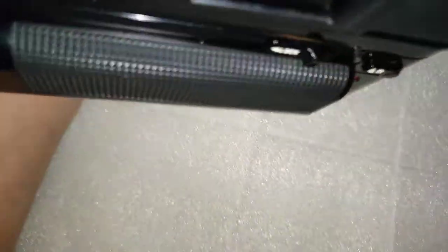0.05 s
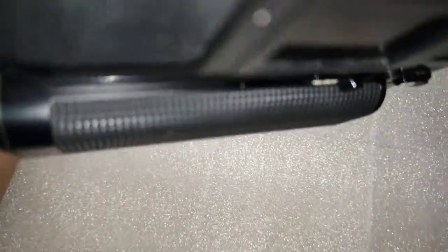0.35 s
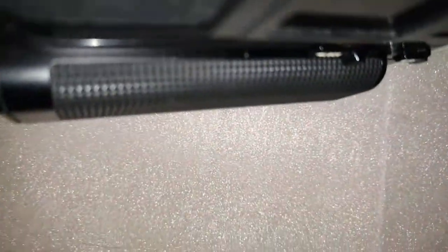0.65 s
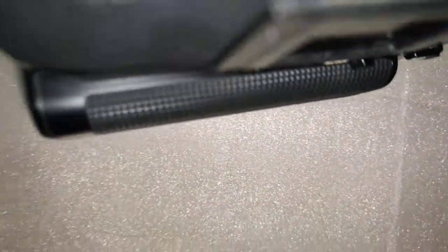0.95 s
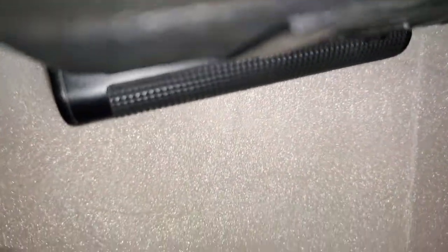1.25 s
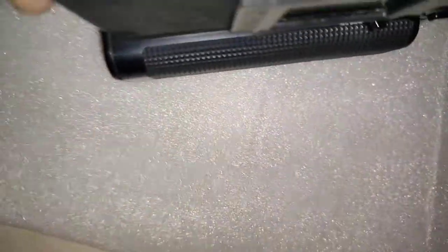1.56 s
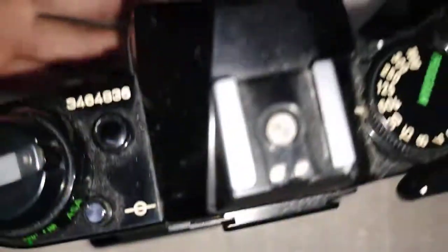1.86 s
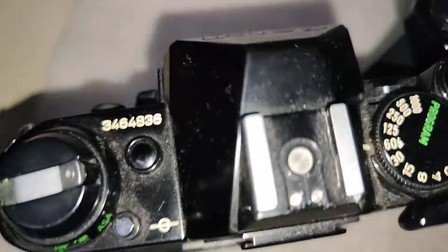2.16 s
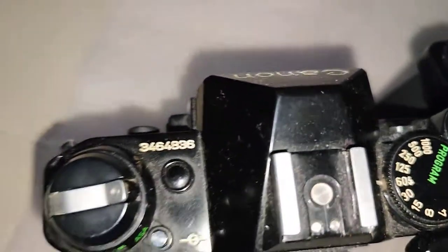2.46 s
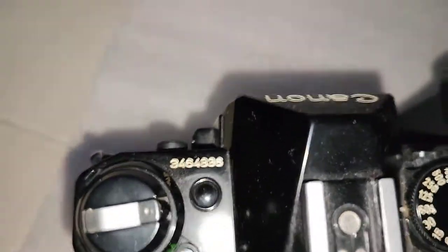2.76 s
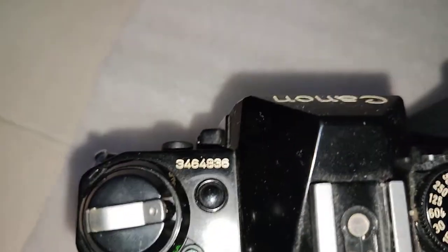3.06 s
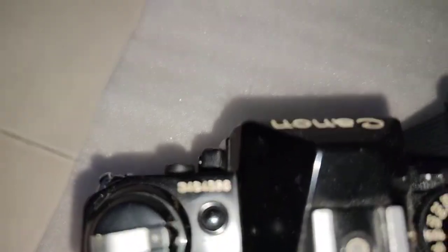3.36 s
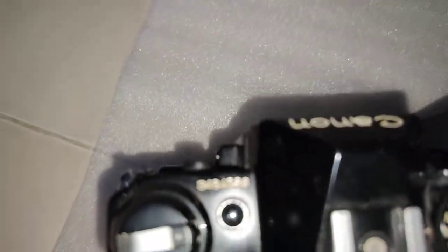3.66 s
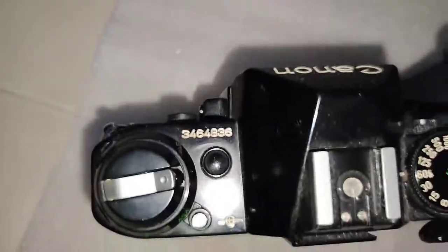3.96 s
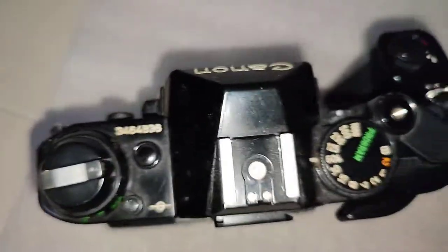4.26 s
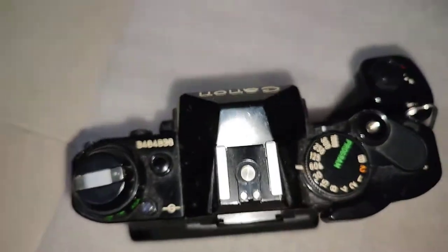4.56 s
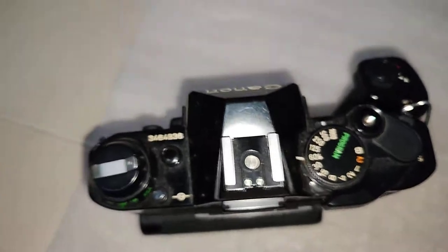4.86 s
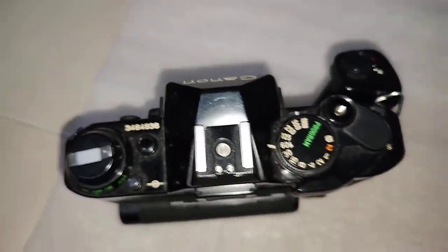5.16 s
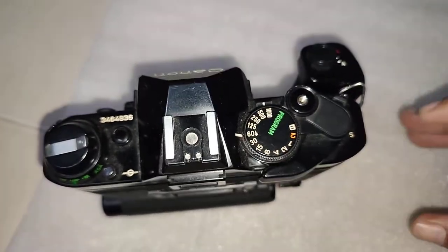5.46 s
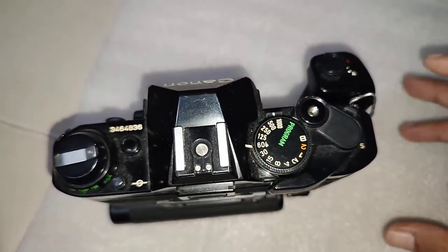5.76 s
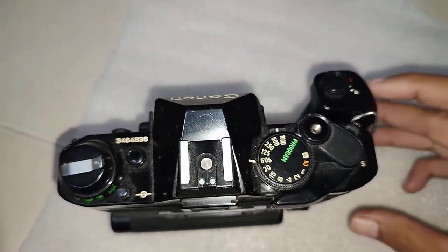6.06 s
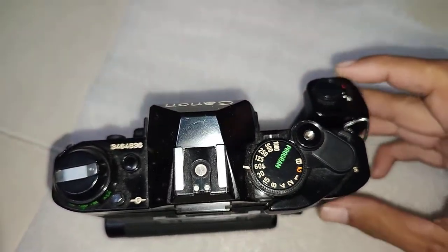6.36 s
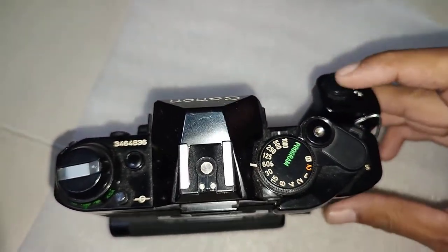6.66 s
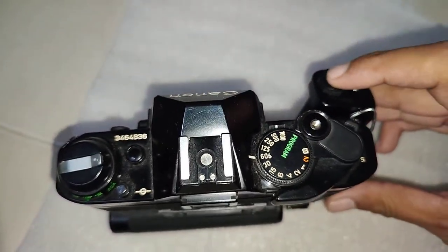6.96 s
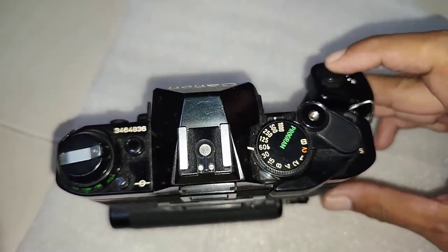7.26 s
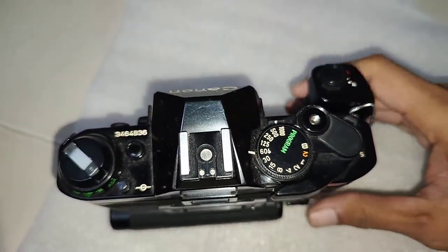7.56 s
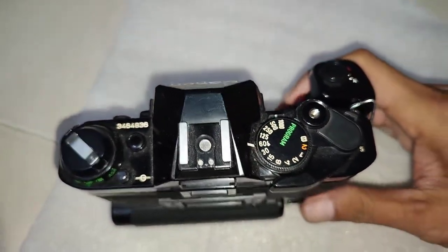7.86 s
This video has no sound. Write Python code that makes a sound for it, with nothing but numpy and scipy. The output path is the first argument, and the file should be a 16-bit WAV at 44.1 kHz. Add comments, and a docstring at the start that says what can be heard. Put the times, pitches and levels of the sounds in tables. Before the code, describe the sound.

A film camera takes a single shot, its crisp mirror and shutter clack followed at once by a brief winding whir and a closing click. Before that come several seconds of much quieter sound: dry finger scrapes and scattered ticks on the handheld recorder, one light knock, then a few soft arm rustles. A faint fan drone and deep handling rumble lie underneath, in a small room.

```python
"""Motor-drive film camera, one shot.

A phone is moved over a film camera in a small, quiet room; fingers rub and tick on the phone's case.
An arm reaches over with a soft rustle and the camera fires: mirror and shutter clack, then the motor
winds the film on through its gears until it hits the stop. The room rings briefly over a low fan hum."""
import sys
import numpy as np
from scipy import signal
from scipy.fft import rfft, irfft
from scipy.io import wavfile

SR = 44100
rng = np.random.default_rng(int(sys.argv[2]) if len(sys.argv) > 2 else 0)


def materialize(psi):
    """Save the field psi as 16-bit PCM at rate SR to the path in sys.argv[1].

    A 1-D psi becomes a single channel; in a 2-D psi each row is a channel.
    """
    bounded = np.clip(np.atleast_2d(psi).T, -1, 1)
    quanta = np.round(bounded * 32767).astype(np.int16)
    wavfile.write(sys.argv[1], SR, quanta)


N = 353682
TIME = np.arange(N) / SR


def amp(db):
    """Decibels to gain."""
    return 10 ** (np.asarray(db) / 20)


def unit(x):
    """Scales to rms 1."""
    return x / np.sqrt(np.mean(x ** 2) + 1e-20)


def read(points, hz):
    """Reads a table along a log-frequency axis."""
    f, value = np.transpose(points)
    return np.interp(np.log(hz + 1), np.log(f + 1), value)


def follow(points):
    """Reads a (time, value) table at every sample."""
    return np.interp(TIME, *np.transpose(points))


def gate(start, end, rise_s, fall_s, t=TIME):
    """Open from start to end, with soft edges outside them."""
    return np.exp(-np.maximum((start - t) / rise_s, 0) ** 2 - np.maximum((t - end) / fall_s, 0))


def panned(side_db):
    """Constant-power gains, left side_db above right."""
    pair = amp(np.array([side_db, -side_db]) / 2).reshape(2, -1)
    return pair / np.sqrt(np.mean(pair ** 2, 0))


def narrow(pair, side_db=1.4):
    """Mid and side to a narrow stereo image."""
    mid, side = pair
    return np.array([mid + side / 2, mid - side / 2]) * panned(side_db)


def add(mix, at_s, sound):
    """Mixes a stereo sound in."""
    part = mix[:, round(at_s * SR):][:, :sound.shape[1]]
    part += sound[:, :part.shape[1]]


def colour(x, db_at, size=4096):
    """Minimum-phase filter of unit energy, shaped by db_at(Hz)."""
    hz = abs(np.fft.fftfreq(size, 1 / SR))
    log_gain = np.log(amp(np.maximum(db_at(hz), -100)))
    taps = np.fft.ifft(np.exp(np.conj(signal.hilbert(log_gain)))).real[:size // 2]
    return signal.oaconvolve(x, taps[None] / np.linalg.norm(taps), axes=1)[:, :x.shape[1]]


def resonate(x, hz, width_hz):
    """A resonance that follows the curve hz."""
    carrier = np.exp(2j * np.pi * np.cumsum(hz) / SR)
    r = np.exp(-np.pi * width_hz / SR)
    return 2 * (carrier * signal.lfilter([(1 - r) ** 2], [1, -2 * r, r * r], x / carrier)).real


def noise(db_at, channels=2):
    """Steady noise of rms 1, shaped by db_at(Hz)."""
    white = rfft(rng.standard_normal((channels, N)))
    return unit(irfft(white * amp(db_at(np.fft.rfftfreq(N, 1 / SR))), N))


def grit(per_s, spread_db):
    """Dense tiny impacts of uneven size, rms 1."""
    size = amp(spread_db * np.minimum(rng.exponential(1, N), 4))
    return unit(rng.standard_normal((2, N)) * size * (rng.random(N) < per_s / SR))


# Room decay (frequency [Hz], T60 [s])
ROOM_T60 = [(200, 0.2), (1000, 0.28), (2500, 0.32), (6000, 0.28), (13000, 0.25)]

def room(x, wet_db=-6.5, gap_s=0.0013, build_s=0.0011):
    """Adds dense reflections off floor and walls, each band dying at its own rate."""
    hz, t, bands = signal.stft(rng.standard_normal((2, SR // 2)), SR, nperseg=256)
    tail = signal.istft(bands * amp(-60 * t / read(ROOM_T60, hz)[:, None]), SR, nperseg=256)[1]
    tail *= 1 - np.exp(-np.maximum(TIME[:tail.shape[1]] - gap_s, 0) / build_s)
    return x + amp(wet_db) * signal.fftconvolve(x, tail / np.linalg.norm(tail[0]), axes=1)[:, :N]


# Air spectrum (frequency [Hz], gain [dB])
AIR_COLOUR = [(220, -24.5), (380, -4), (507, -8.5), (617, -8), (811, -11), (1130, -11.5), (1490, -14.5),
              (2070, -13.5), (2240, -14.5), (2720, -14.5), (9430, -24.5), (14200, -27)]
# Left-right likeness (frequency [Hz], coherence [0-1])
AIR_COHERENCE = [(60, 0.79), (180, 0.98), (550, 0.1), (1650, 0.3), (4960, 0.1), (15000, 0.1)]

def room_air(db=-72.5):
    """Faint hiss, partly shared by the two microphones."""
    left, other = rfft(noise(lambda f: read(AIR_COLOUR, f)))
    coherence = read(AIR_COHERENCE, np.fft.rfftfreq(N, 1 / SR))
    right = coherence * left + np.sqrt(1 - coherence ** 2) * other
    return amp(db) * irfft(np.array([left, right]), N)


# Drone bands (centre [Hz], half-width [Hz], level [dB])
FAN_BANDS = [(96, 9, -68), (171, 9, -72), (44, 8, -70), (130, 85, -68)]

def fan(tone_hz=95.9, tone_db=-65):
    """A fan's steady tone in a low drone."""
    drone = sum(amp(db) * noise(lambda f: -20 * np.log10(1 + ((f - hz) / width_hz) ** 2))
                for hz, width_hz, db in FAN_BANDS)
    tone = amp(tone_db) * np.sqrt(2) * np.sin(2 * np.pi * (tone_hz * TIME + rng.random()))
    return tone + narrow(drone)


# Rumble envelope (time [s], level [dB])
RUMBLE_LEVEL = [(0, -56.5), (.8, -55), (1.0, -58), (2.4, -60.5), (3, -62.5), (4, -60), (5.2, -60),
                (6, -63.5), (8, -63)]

def hand_rumble():
    """The moving hand that holds the phone rumbles in the deep bass."""
    hz_db = [(12, -15), (25, -5), (32, -5), (43, 0), (65, -14), (200, -50), (1000, -100)]
    return narrow(noise(lambda f: read(hz_db, f)) * amp(follow(RUMBLE_LEVEL)))


# Arm movements (start [s], end [s], level [dB], tilt [dB/octave])
RUSTLES = [(5.271, 5.482, -64, 2), (5.781, 6.068, -67.5, 0), (6.239, 6.438, -69.5, 1.3),
           (6.76, 6.9, -74.5, -1)]
# Rustle spectrum at each microphone (frequency [Hz], gain [dB])
RUSTLE_LEFT = [(200, -6), (450, 3), (1000, -5.5), (1500, -4.5), (1800, 0.5), (2150, 10.5), (2550, 0),
               (2900, -6), (4000, -2.5), (7000, -5.5), (10000, -14.5), (14000, -12)]
RUSTLE_RIGHT = [(200, -6), (450, 1.5), (1000, -2), (1600, 1), (2200, 2.5), (3500, 2), (5500, 0.5),
                (7200, 3.5), (8700, -12), (14000, -8.5)]

def rustles(side_db=-2, pivot_hz=3000, rise_s=0.089, fall_s=0.097):
    """The arm moves beside the phone: smooth swells of soft hiss."""
    out = np.zeros((2, N))
    for start, end, db, tilt in RUSTLES:
        t = np.arange(start - .25, end + .5, 1 / SR)
        hiss = np.vstack([colour(rng.standard_normal((1, len(t))),
                                 lambda f: read(mic, f) + tilt * np.log2((f + 1) / pivot_hz))
                          for mic in (RUSTLE_LEFT, RUSTLE_RIGHT)])
        add(out, t[0], amp(db) * panned(side_db) * gate(start, end, rise_s, fall_s, t) * hiss)
    return out


# Hard finger drags (start [s], end [s], level [dB], L-R [dB])
DRAGS = [(1.612, 1.653, -52.5, -1), (1.72, 1.763, -63.5, -3), (3.644, 3.643, -55.5, 17),
         (4.34, 4.365, -55, 16), (4.544, 4.64, -60.5, 4)]

def drags():
    """A firm finger judders over the case: coarse, dull grains."""
    hz_db = [(60, -6), (250, 6.5), (700, -3), (1400, 4), (2500, -13), (4000, -15), (10000, -31)]
    press = sum(amp(db) * panned(side_db) * gate(start, end, rise_s=0.0071, fall_s=0.023)
                for start, end, db, side_db in DRAGS)
    return colour(grit(per_s=1800, spread_db=4) * press, lambda f: read(hz_db, f))


# Skin friction spectrum (frequency [Hz], gain [dB])
RUB_COLOUR = [(350, -16.5), (600, -10.5), (954, -9), (1420, -6), (2350, -3.5), (3440, -3.5), (4550, -5),
              (6000, -5.5), (7330, 0), (8400, -6.5), (9800, -11.5), (12400, -8.5), (14200, -14.5)]
# Finger strokes (start [s], end [s], level [dB], relative treble [dB], first resonance [Hz],
# last resonance [Hz], relative resonance [dB], L-R [dB])
STROKES = [(0.448, 0.538, -71.5, -6.5, 3300, 3600, 0, -11), (0.639, 0.677, -66, -7.5, 2700, 3180, -7, -8),
           (0.718, 0.815, -65, -4.5, 3500, 3200, -2, -6), (0.89, 0.97, -71.5, -8, 3600, 3300, -8, -6),
           (1.079, 1.15, -64.5, -11, 3430, 3840, -1, -6.5), (1.267, 1.311, -62, -6.5, 3700, 3300, -2.5, -5),
           (1.35, 1.456, -58.5, -8, 3400, 3400, -1, -4.5), (1.484, 1.64, -61, 1.5, 2670, 2550, -2, -5),
           (1.62, 1.79, -65, -9.5, 2400, 2250, -3, -5.5), (1.832, 1.876, -63.5, -1, 3300, 3700, -4, -2),
           (2.247, 2.327, -63, 0, 2060, 2300, -2, -3.5), (2.355, 2.51, -66.5, 0, 1950, 2100, -13, -3),
           (2.56, 2.631, -66.5, -7.5, 2600, 2300, -18, -10), (2.806, 2.839, -69, -7, 2500, 2400, -11, -9),
           (3.49, 3.632, -66, -10.5, 2170, 2190, -0.5, -5.5), (3.665, 3.747, -63.5, -1, 2150, 2130, -8, 9),
           (3.785, 4.042, -69, -10.5, 2080, 2280, -15, 4.5),
           (4.053, 4.308, -64.5, -5, 2100, 2460, -12, 1.5), (4.348, 4.391, -59.5, 8.5, 2500, 3500, -22, 15),
           (4.57, 4.572, -59, 0, 2410, 2100, -2, 10), (4.44, 4.78, -68.5, -7.5, 2090, 2410, -9, -1),
           (4.832, 4.886, -60.5, -6, 2900, 2400, -9, -18)]

def rubs(split_hz=5000, waver_hz=34.5, waver_db=1.5, wander=0.021, ends_db=-2.5):
    """Skin sticks and slips on the case; the grip's resonance glides and wavers with the pressure."""
    slip = colour(grit(per_s=16000, spread_db=0), lambda f: read(RUB_COLOUR, f))
    dull = signal.sosfiltfilt(signal.butter(2, split_hz, fs=SR, output="sos"), slip)
    bright = unit(slip - dull)
    pressure = noise(lambda f: -20 * np.log10(1 + (f / waver_hz) ** 4), channels=1)[0]
    out = np.zeros((2, N))
    for start, end, db, treble_db, first_hz, last_hz, ring_db, side_db in STROKES:
        near = slice(round((start - .1) * SR), round((end + .2) * SR))
        t = TIME[near]
        along = np.clip((t - start) / (end - start), 0, 1)
        press = amp(db + ends_db * (2 * along - 1) ** 2 + waver_db * pressure[near])  # firmest halfway
        press *= gate(start, end, rise_s=0.031, fall_s=0.018, t=t)
        hz = (first_hz + (last_hz - first_hz) * along) * (1 + wander * pressure[near])
        width_hz = 480 * (first_hz / 2200) ** 4.2  # high resonances are the most damped
        ring = unit(resonate(dull[:, near], hz, width_hz))
        scrape = unit(unit(dull[:, near]) + amp(ring_db) * ring)
        out[:, near] += press * panned(side_db) * (scrape + amp(treble_db) * bright[:, near])
    return out


def smear(x, spread_s, at_hz=1000):
    """Softens an attack by smearing it in time, treble first; at_hz comes spread_s late."""
    f = np.fft.rfftfreq(x.shape[1], 1 / SR)
    phase = 4 * np.pi * spread_s * np.sqrt(f * at_hz)
    return irfft(rfft(x) * np.exp(-1j * phase), x.shape[1])


# Phone's bump response: a thump and two short rings (frequency [Hz], gain [dB])
BUMP_COLOUR = [(60, -9), (200, 1), (650, 2.5), (950, -3), (1250, 2.5), (1900, -4.5), (2330, 1), (2800, -10),
               (3300, -14), (4100, -10), (6500, -11), (7800, -28), (14000, -36)]

def bump(at_s=4.6589, db=-18.5, side_db=-17.5, spread_s=0.00022):
    """A fingertip lands on the phone with one hard, short push."""
    push = colour(signal.unit_impulse(SR // 10)[None], lambda f: read(BUMP_COLOUR, f))
    out = np.zeros((2, N))
    add(out, at_s, amp(db) * panned(side_db) * smear(push / abs(push).max(), spread_s))
    return out


# Path through the case to each microphone (frequency [Hz], gain [dB])
CASE_LEFT = [(600, 2), (1200, 5.5), (3500, -0.5), (7500, 5), (9000, 1), (10200, -21), (14000, -9)]
CASE_RIGHT = [(600, 2), (1200, -2.5), (3500, 0.5), (5000, -3), (7000, 1), (9500, -7), (13000, 1.5)]

def tick(hz, below_db, above_db, ring_db=4, rattle_db=-27, rattle_t60_s=0.025):
    """A dry snap with a short rattle, peak 1; the case rings at hz."""
    def tick_db(f):
        skirt_db = np.where(f < hz, below_db, above_db) * abs(np.log2((f + 1) / hz)) ** 1.194
        return ring_db / (1 + ((f - hz) / (0.11 * hz)) ** 2) - skirt_db
    t = TIME[:2048]
    force = (t == 0) + amp(rattle_db - 60 * t / rattle_t60_s) * rng.standard_normal((2, len(t)))
    snap = np.vstack([colour(part[None], lambda f: tick_db(f) + read(path, f))
                      for part, path in zip(force, (CASE_LEFT, CASE_RIGHT))])
    return snap / abs(snap).max()


# Single ticks (time [s], level [dB], centre [Hz], L-R [dB], loss an octave below [dB],
# loss an octave above [dB], ring [dB], spread [s])
TICKS = [(0.739, -18, 3450, -11.5, 6, 3.5, 9, 0.0017), (0.8824, -24.5, 3500, -13, 5.5, 4.5, 9.5, 0.0019),
         (1.6094, -31.5, 2250, -10, 3.5, 12, 5, 0.0019), (1.631, -28, 2600, -7, 7, 8, 5.5, .002),
         (1.6575, -33, 1890, -9, 2.5, 11.5, 3, 0.00095), (1.8362, -26.5, 4600, 16, 7.5, 9, -3.5, .001),
         (1.8386, -32, 4600, 16, 6, 10, 0, .0005), (2.3134, -33.5, 2270, -7, 5.5, 13, 5.5, .0005),
         (2.3172, -40, 2300, -13, 7, 12.5, 5, 0.00051), (2.8523, -20, 7100, 24, 5, 13, 0.5, .0005),
         (3.649, -33.5, 1400, 20, 0, 4.5, 3, 0.00049), (3.878, -37, 1310, 15, 5, 4.5, -5, .0003),
         (4.037, -31, 5100, 17, 5.5, 7, 5, .001), (4.0386, -29, 5570, 17, 5.5, 7, -1, .0015),
         (4.2616, -28, 3850, 18, 4, 6, 3.5, 0.00046), (4.268, -36, 3870, 18, 4, 7, 3, .002),
         (4.4874, -30, 1190, 24, 2, 4, 2, 0.00048), (4.528, -28.5, 3400, -20, 9, 8, 2, 0.00047),
         (4.624, -32, 2320, -8, 1.5, 5, 9, 0.00093), (4.6987, -31.5, 950, -17, 7, 6, -3, .0004),
         (4.7749, -26, 2010, -25, 4, 7.5, 9.5, 0.00049), (6.612, -49.5, 2000, 0, 7, 7, 17, 0.00047)]
# Runs of repeated ticks, from slips or bounces (time [s], repeats [count], gap [s], first peak [dB], loss per
# repeat [dB], centre [Hz], L-R [dB], loss an octave below [dB], loss an octave above [dB], rattle [dB])
TICK_RUNS = [(1.715, 3, 0.02, -44, 1, 2250, -17, 3, 18, -8),
             (2.863, 3, .006, -40.5, 2, 4000, 13, 4.5, 12, -12),
             (3.0186, 2, 0.008, -25, 4, 5340, 20, 5, 6.5, -22),
             (3.022, 2, .0095, -32.5, 1.5, 5000, 19, 4, 8, -17.5)]

def finger_ticks(lag_s=0.0018):
    """Fingers tick on the case; some ticks come in evenly spaced, fading runs, as a finger catches and slips or
    a tick bounces."""
    out = np.zeros((2, N))
    for at_s, db, hz, side_db, below_db, above_db, ring_db, spread_s in TICKS:
        snap = smear(tick(hz, below_db, above_db, ring_db), spread_s)
        add(out, at_s + lag_s, amp(db) * panned(side_db) * snap)
    for at_s, repeats, gap_s, db, fade_db, hz, side_db, below_db, above_db, rattle_db in TICK_RUNS:
        for k in range(repeats):
            snap = tick(hz, below_db, above_db, rattle_db=rattle_db, rattle_t60_s=0.014)
            add(out, at_s + lag_s + k * gap_s, amp(db - k * fade_db) * panned(side_db) * snap)
    return out


def strikes(blows, crack_db=1, crack_s=0.0011, t60_s=0.044, side_db=-0.5):
    """Each blow is a crack and a fast-dying chatter of small metal parts."""
    force, t = np.zeros((2, N)), TIME[:SR // 5]
    decay = amp(-60 * t / t60_s) + amp(crack_db) * np.exp(-t / crack_s)
    for at_s, db, rise_s in blows:
        envelope = amp(db) * decay * (1 - np.exp(-t / rise_s))
        add(force, at_s, panned(side_db) * envelope * rng.standard_normal((2, len(t))))
    return force


# Camera's balance between the microphones (frequency [Hz], L-R [dB])
CAMERA_SIDE = [(300, 1), (700, -2.5), (1300, 1.5), (2300, 1), (3000, 1), (4400, 1), (5800, -0.5),
               (7200, -6), (8400, 6.5), (10300, -4.5), (14000, 1.5)]

def shell(x, broad, modes, ring_db=0):
    """A ringing housing, coloured differently in the left and right microphones."""
    def shell_db(f):
        peaks = sum(amp(db + ring_db) ** 2 / (1 + (2 * (f - hz) / width_hz) ** 2)
                    for hz, width_hz, db in modes)
        return read(broad, f) + 10 * np.log10(1 + peaks)
    left = colour(x[:1], lambda f: shell_db(f) + read(CAMERA_SIDE, f) / 2)
    right = colour(x[1:], lambda f: shell_db(f) - read(CAMERA_SIDE, f) / 2)
    return np.vstack([left, right])


# Motor speed, sagging under the film's pull (time [s], speed [turns/s])
MOTOR_SPEED = [(7.36, 75.6), (7.38, 94.6), (7.41, 126), (7.435, 134), (7.47, 120), (7.515, 112),
               (7.545, 125), (7.65, 68)]
# Winding stroke (time [s], level [dB])
WINDING_LEVEL = [(7.37, -37.5), (7.405, -31.5), (7.44, -36.5), (7.47, -33.5), (7.515, -35.5),
                 (7.545, -35.5)]
# Shaft and first-mesh tones (order [multiple of speed], relative level [dB])
WHINE_ORDERS = [(1, -4.5), (2, -8.5), (3, -15), (8, -5.5), (16, -4)]
# Gear train spectrum (frequency [Hz], gain [dB])
GEAR_COLOUR = [(120, -44), (200, -16), (261, -20), (515, -12.5), (615, -16), (710, -13), (1300, -10),
               (2200, -1), (3060, -2.5), (3900, -1), (4700, -3), (7200, -1.5), (9000, -9.5), (14200, -9.5)]
# Housing and gear resonances (frequency [Hz], width [Hz], gain [dB])
DRIVE_MODES = [(1590, 90, -2), (2120, 34, 2), (2245, 30, 1), (2400, 29, 3), (2818, 25, 0), (3280, 35, 2),
               (3620, 43, 2), (3765, 46, 4), (4180, 25, -3), (5400, 110, 2), (6190, 41, 1), (6630, 45, 4),
               (7220, 150, 0), (8250, 24, 2)]

def motor(gears_db=-1.14, mesh_order=3.2, mesh_depth=0.17, wobble=0.2, buzz_db=-18, whine_db=-54):
    """Gear teeth scrape in time with the shaft, the commutator buzzes; the rotor coasts at the end."""
    turns = np.cumsum(follow(MOTOR_SPEED)) / SR
    angle = 2 * np.pi * turns
    running = gate(7.39, 7.56, rise_s=0.026, fall_s=0.034)
    mesh = (1 + mesh_depth * np.cos(mesh_order * angle)) * (1 + wobble * np.cos(angle))
    scrape = unit(grit(per_s=4500, spread_db=1) * mesh)
    buzz = unit(np.diff(np.floor(2 * turns), prepend=0))  # two sparks a turn
    force = (scrape + amp(buzz_db) * buzz) * running * amp(follow(WINDING_LEVEL) + gears_db)
    whine = sum(amp(db) * np.sin(order * angle) for order, db in WHINE_ORDERS)
    return shell(force, GEAR_COLOUR, DRIVE_MODES, ring_db=2.5) + amp(whine_db) * running * whine


# Blows in the drive (time [s], level [dB], rise [s])
DRIVE_BLOWS = [(7.3656, -36, .0015), (7.371, -35, 0.00052), (7.389, -32, .0015), (7.41, -32, .0006),
               (7.459, -29, 0.00053), (7.474, -33, .0005), (7.5407, -28.5, 0.0011), (7.552, -21.5, .002),
               (7.5565, -23.5, 0.0006), (7.568, -32.5, .0008), (7.584, -40, .0005)]

def pawls():
    """Clutch, pawls and end stop strike the drive's housing."""
    return shell(strikes(DRIVE_BLOWS), GEAR_COLOUR, DRIVE_MODES)


# Hollow knocks (time [s], level [dB], centre [Hz], T60 [s])
KNOCKS = [(7.0776, -32.5, 1500, .025), (7.119, -47, 310, 0.053), (7.135, -46, 560, .07),
          (7.248, -57.5, 800, .09), (7.284, -55.5, 900, 0.091), (7.324, -55.5, 754, 0.1),
          (7.5527, -42.5, 380, 0.06)]

def knocks(skirt_db_per_octave=7.5, lowpass_hz=2500):
    """The heavier blows rock the camera on its base."""
    out, t = np.zeros((2, N)), TIME[:SR // 5]
    for at_s, db, hz, t60_s in KNOCKS:
        def knock_db(f):
            octaves = abs(np.log2((f + 1) / hz))
            return -skirt_db_per_octave * octaves - 20 * np.log10(1 + (f / lowpass_hz) ** 2)
        blow = amp(db - 60 * t / t60_s) * rng.standard_normal((2, len(t)))
        add(out, at_s, colour(blow, knock_db))
    return out


def recoil(at_s=7.077, jolt_db=-33, settle_s=0.04, push_db=-43, push_s=0.0071, lowpass_hz=300):
    """The mirror's swing pushes the air and its stop jolts the camera: one low thump."""
    t = TIME - at_s
    push = amp(push_db) * np.exp(-abs(t) / push_s) * (t < 0)
    age = np.maximum(t, 0) / settle_s
    jolt = -amp(jolt_db) * (1 - age) * np.exp(-age) * (t >= 0)
    return signal.sosfilt(signal.butter(2, lowpass_hz, fs=SR, output="sos"), push + jolt)


# Finger on the grip, mirror, curtains, mirror return, latches (time [s], level [dB], rise [s])
SHUTTER_BLOWS = [(6.613, -59, 0.00063), (7.0718, -17, 0.0035), (7.0753, -19, 0.00081),
                 (7.0774, -20, 0.00041), (7.087, -31, .0003), (7.0917, -29.5, .0003),
                 (7.1155, -25.5, .0003), (7.1332, -26.5, 0.0006), (7.138, -32, .0003),
                 (7.1507, -23, 0.00058), (7.1532, -22, 0.00038), (7.168, -39, .0005),
                 (7.2152, -28.5, 0.00058), (7.2215, -29.5, 0.00041), (7.2812, -36, .002),
                 (7.294, -37.5, 0.0011)]
# Lever chatter (time [s], level [dB])
LEVER_LEVEL = [(7.095, -34), (7.101, -39), (7.145, -27), (7.17, -46), (7.24, -37), (7.3, -42), (7.35, -57)]
# Shutter spectrum (frequency [Hz], gain [dB])
SHUTTER_COLOUR = [(120, -49.5), (200, -26), (553, -18), (626, -19.5), (1110, -14), (1350, -8), (1500, -8),
                  (1800, -4.5), (2200, -1), (2650, -4), (3230, -4), (3790, -1.5), (4600, -3), (7470, 0.5),
                  (9090, -8.5), (14200, -7.5)]
# Camera body resonances (frequency [Hz], width [Hz], gain [dB])
BODY_MODES = [(1220, 67, -2), (1370, 50, -1), (1710, 36, 4), (1800, 20, 3), (1905, 40, 3), (2140, 25, 1),
              (3080, 18, 0), (3418, 25, 2), (3540, 35, 3), (3715, 25, 1), (4765, 24, -2), (5250, 60, -2),
              (6325, 38, -1), (7154, 24, 0), (7342, 45, 2), (7651, 20, 1), (7920, 70, -5), (8275, 35, -2)]

def shutter(levers_db=-10):
    """Mirror and curtains strike the body; levers run in between and chatter to rest."""
    levers = grit(per_s=11000, spread_db=-0.5) * amp(follow(LEVER_LEVEL) + levers_db)
    levers *= gate(7.09, 7.35, rise_s=0.0036, fall_s=0.0053)
    return shell(strikes(SHUTTER_BLOWS) + levers, SHUTTER_COLOUR, BODY_MODES)


def mirror_stop(at_s=7.0778, db=-9, contact_s=0.0007, modes_db=-31, ref_width_hz=40):
    """The mirror hits its stop: the hardest snap of the shot, which sets the body's modes ringing."""
    snap = amp(db) * np.exp(-abs(TIME - at_s) / contact_s) * rng.standard_normal((2, N))
    out = shell(snap, SHUTTER_COLOUR, BODY_MODES, ring_db=3)
    t = TIME[:SR // 4]
    for hz, width_hz, mode_db in BODY_MODES:
        envelope = (1 - np.exp(-t / contact_s)) * np.exp(-np.pi * width_hz * t)
        ring = envelope * np.sin(2 * np.pi * (hz * t + rng.random((2, 1))))
        gain = amp(modes_db + mode_db) * width_hz / ref_width_hz
        add(out, at_s, gain * panned(read(CAMERA_SIDE, hz)) * ring)
    return out


def scene():
    """Camera parts get their own reflections; handling is nearly dry, right at the microphones."""
    camera = room(shutter() + knocks()) + room(mirror_stop()) + room(motor()) + room(pawls()) + recoil()
    handling = room(finger_ticks() + bump() + rubs() + drags(), wet_db=-23)
    return camera + handling + rustles() + room_air() + fan() + hand_rumble()


def record(dry):
    """The phone's band limit."""
    lowpass = signal.firwin(401, cutoff=14400, window=("kaiser", 8), fs=SR)
    return signal.oaconvolve(dry, lowpass[None], "same", axes=1)


dry = scene()
out = record(dry)
materialize(out)
```